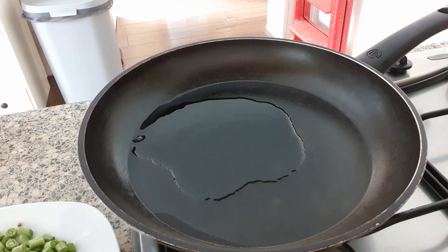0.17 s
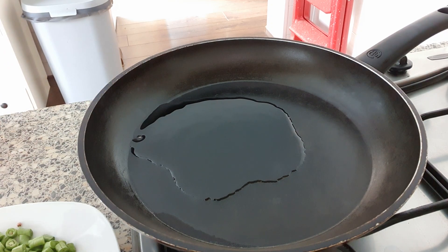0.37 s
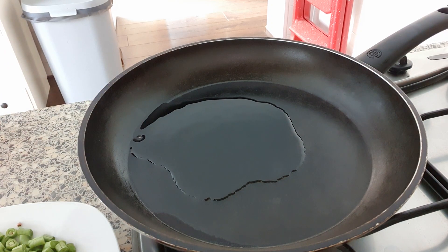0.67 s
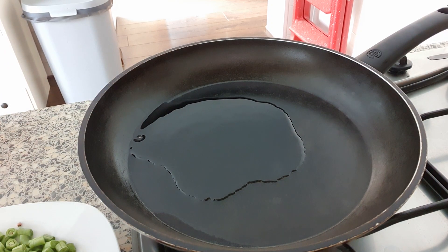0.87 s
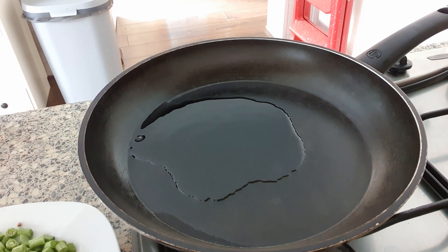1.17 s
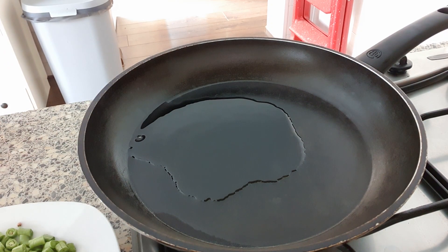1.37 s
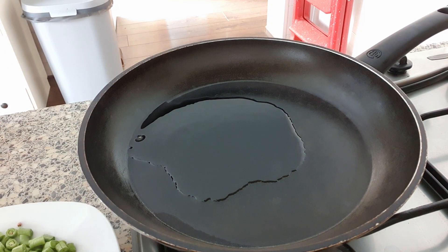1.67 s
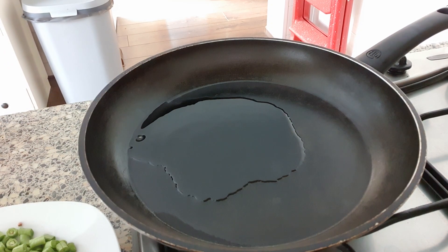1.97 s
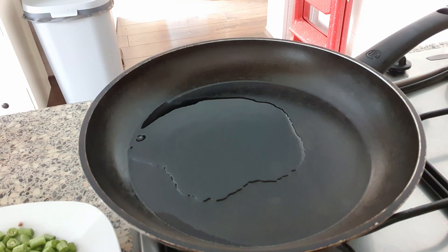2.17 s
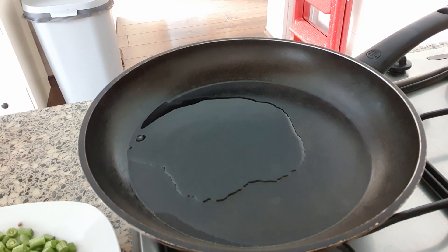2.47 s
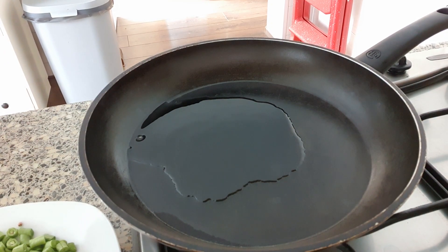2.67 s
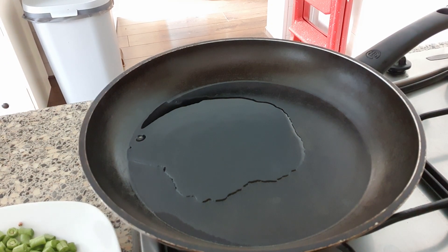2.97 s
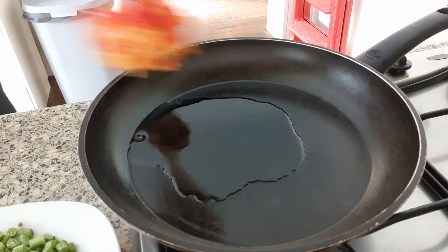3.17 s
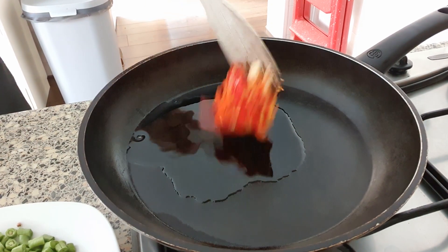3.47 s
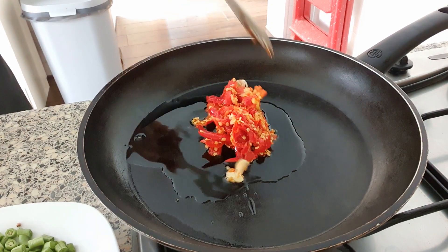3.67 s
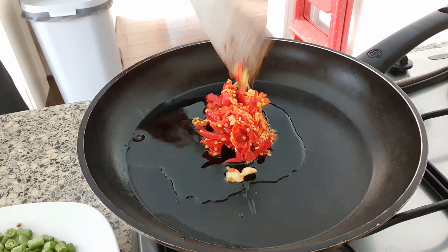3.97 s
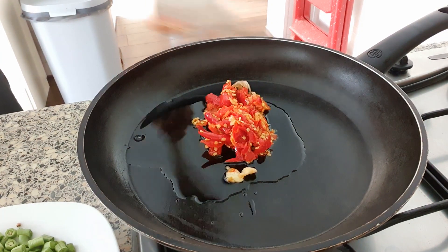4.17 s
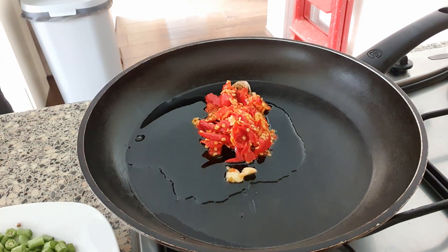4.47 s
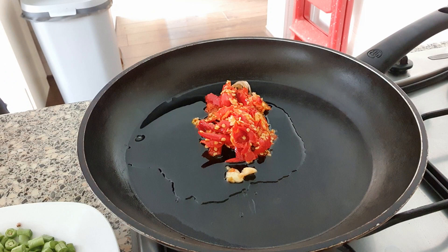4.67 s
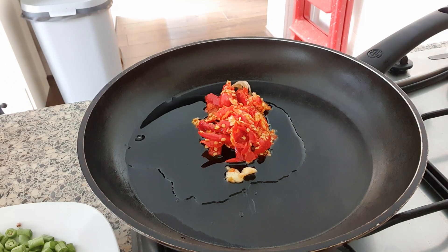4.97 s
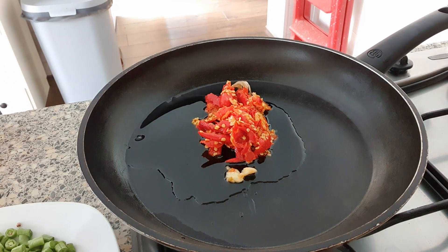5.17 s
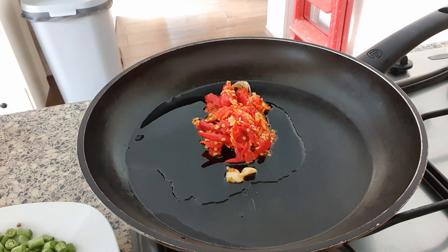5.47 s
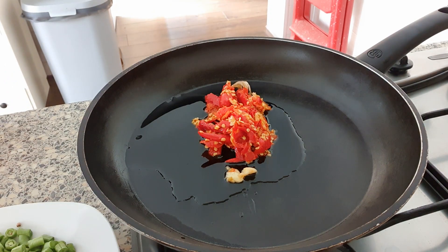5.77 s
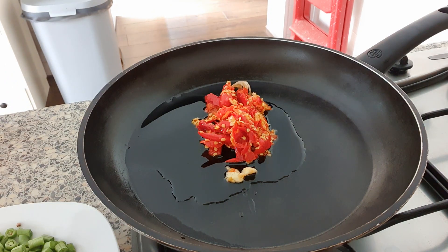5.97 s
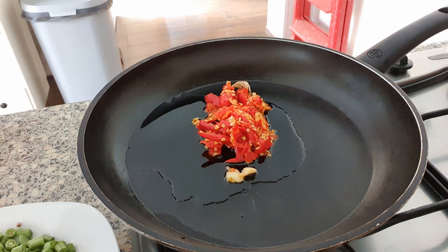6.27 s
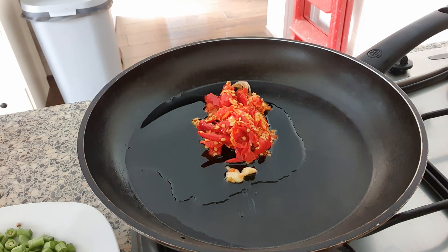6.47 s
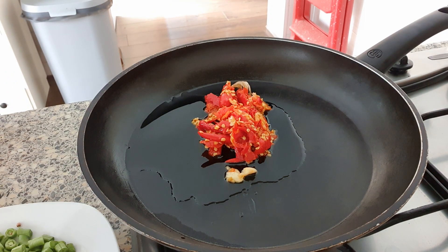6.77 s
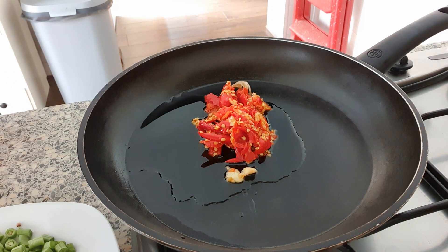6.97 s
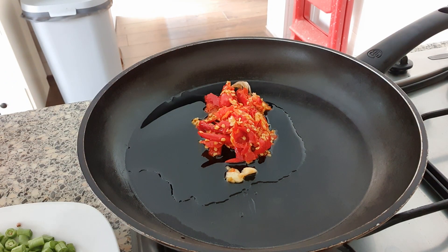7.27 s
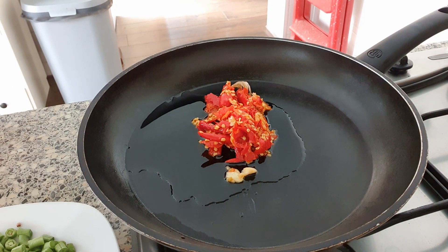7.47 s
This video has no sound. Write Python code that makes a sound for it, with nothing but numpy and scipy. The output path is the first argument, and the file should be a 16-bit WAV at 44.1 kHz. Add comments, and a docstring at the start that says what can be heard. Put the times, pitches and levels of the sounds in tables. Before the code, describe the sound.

A gas burner hisses quietly and steadily throughout, over a low appliance hum and a faint, swelling rumble in a small kitchen. Right at the start, something heavy lands on the counter in a quick cluster of loud, booming thumps. Soft scraping follows until about 0.7 seconds, then two light taps near 1 second. Only a few faint bumps interrupt the hiss until 3.5 seconds, when chillies hit the oil with one short, soft spatter that dies at once. From about 4.9 seconds, close and slightly to the left, a spoon rasps over a bowl and knocks it several times, with dull bumps underneath. The loudest ringing knocks come at about 5.5 and 5.8 seconds, the second one brighter. The scraping fades by 6.5 seconds. After the loudest knock everything sounds slightly quieter, until the hiss and hum recover around 7 seconds.

```python
"""A small kitchen, where a gas burner's jets hiss under a frying pan over a low appliance hum and rumble.
Something heavy lands and sets the counter booming, and chillies hit the oil with one short spatter.
Just to the left, a spoon rasps over a bowl and knocks it into ringing. After the loudest blow
the camera turns its gain down for a while."""
import sys
import numpy as np
from scipy import signal
from scipy.fft import rfft, irfft
from scipy.io import wavfile
from scipy.ndimage import uniform_filter1d

SR = 44100
rng = np.random.default_rng(int(sys.argv[2]) if len(sys.argv) > 2 else 0)


def generate_wav(sig):
    """Save sig (samples, or channels by samples) to the path in sys.argv[1] as 16-bit PCM at SR."""
    pcm = np.round(np.clip(np.atleast_2d(sig).T, -1, 1) * 32767).astype(np.int16)
    wavfile.write(sys.argv[1], SR, pcm)


N = 336042
TIME = np.arange(N) / SR

# The bowl's body, led by a close pair that swells and cancels:
# (frequency [Hz], relative level [dB], t60 [s], polarity [+/-1])
BOWL_BODY_MODES = [(573, 0, .1, 1), (596, 0, .1, -1), (584, -21, .3, 1), (790, -24, .07, 1),
                   (860, -24, .07, -1)]
# The bowl's bright clink: (frequency [Hz], relative level [dB])
BOWL_CLINK_MODES = [(366, 1), (790, -25.5), (860, -4), (1105, -5.5), (1370, 3.5), (1840, -2.5), (1900, 4.5),
                    (2175, -5), (2400, -27), (2700, -18), (3060, -1.5), (3305, -1), (3480, -6), (3890, 1.5),
                    (4200, -27), (4530, 2), (5110, -44.5), (5860, -29.5), (6570, 2.5), (7900, -17)]
CLINK_CYCLES = 140  # a free mode dies by 60 dB in this many cycles
# Spoon hits: (time [s], body level [dB], clink level [dB], clink cutoff [Hz])
SPOON_HITS = [(.847, -45.5, -62, 1350), (.988, -48, -64.5, 1500), (4.93, -40, -49, 1800),
              (5.002, -26.5, -34, 4800), (5.243, -26.5, -45, 2500), (5.478, -17, -15.5, 1800),
              (5.482, -7.5, -30.5, 2550), (5.768, -16.5, -7.5, 5000), (5.826, -28, -35, 3000),
              (5.99, -47, -52, 3010), (6.035, -43.5, -39, 3800)]
def spoon_knocks():
    """Body and clink of the bowl: every hit rings the body, and a harder edge reaches higher modes."""
    clink = ringing([(hz, db, min(CLINK_CYCLES / hz, .09)) for hz, db in BOWL_CLINK_MODES])[:8000]
    clink[:900] += .5 * rng.standard_normal(900) * np.exp(-np.arange(900) / 140)  # contact tick
    clinks = np.zeros(N)
    for at, _, db, cutoff_hz in SPOON_HITS:
        lowpass = signal.butter(3, cutoff_hz, fs=SR, output="sos")
        clinks[round(at * SR):][:8000] += gain_of(db) * signal.sosfilt(lowpass, clink)
    times, body_db, _, _ = np.transpose(SPOON_HITS)
    return excite(impulses(times, body_db), ringing(BOWL_BODY_MODES)), clinks


# The counter's boom: (frequency [Hz], relative level [dB], t60 [s])
COUNTER_MODES = [(106.4, -2, 0.5), (155, 5, 0.11), (225, 5.5, 0.038), (304.4, -11, 0.11), (323.5, -1, 0.19),
                 (445, -17.5, 0.044), (660, -7, 0.075), (710, -14.5, .08), (762, -1.5, 0.12),
                 (873, 2, 0.088)]
# Tone of the crack on each blow: (frequency [Hz], relative level [dB])
CRACK_EQ = [(350, -46.5), (600, -6), (853, -17.5), (1050, -25.5), (1230, -18.5), (1740, -23.5),
            (2390, -25.5), (3510, -33.5), (9000, -59), (11700, -94), (19800, -120)]
# Dull blows and soft bumps: (time [s], push level [dB], contact time [s], crack level [dB])
COUNTER_HITS = [(.003, -21, 0.0055, -33.5), (.034, -13.5, 0.0058, -57), (.052, -4, .0023, -15.5),
                (.058, -7, .0026, -56), (.070, -5.5, 0.0021, -55), (.097, -2.5, 0.0038, -22),
                (0.104, -33, .0043, -50), (.118, -13, 0.0038, -42), (.128, -10.5, 0.0016, -42),
                (.142, -17, 0.0031, -44), (.188, -13, 0.0042, -33), (.24, -30, 0.009, -37),
                (0.46, -41, 0.006, -48), (.589, -39.5, 0.0054, -43), (.848, -29, 0.0022, -40),
                (.991, -35.5, .0021, -49), (1.73, -44.5, 0.0049, -58), (1.855, -43.5, .0095, -55),
                (2.189, -42, 0.0022, -59), (2.695, -45, 0.0023, -52), (2.93, -39, 0.0024, -56),
                (4.929, -26, 0.0041, -48), (5.242, -17, .0027, -41), (5.251, -32, 0.002, -57),
                (5.292, -27.5, .0062, -34), (5.512, -24, 0.0043, -60), (5.554, -25.5, 0.0023, -46),
                (5.599, -31.5, 0.0061, -38), (5.77, -22.5, 0.0038, -22.5), (5.835, -24, 0.003, -35),
                (5.855, -25, 0.0043, -42), (6.463, -46.5, 0.0062, -55)]
def counter_thuds():
    """Each blow is one short push that sets the counter booming, with a brief crack of noise."""
    push = np.zeros(N)
    for at, db, contact_s, _ in COUNTER_HITS:
        near = slice(max(round(at * SR) - 1000, 0), round(at * SR) + 1000)
        spread = (np.pi * (TIME[near] - at) / contact_s) ** 2
        push[near] += gain_of(db) * (1 - 2 * spread) * np.exp(-spread)
    boom = gain_of(-34) * excite(push, ringing(COUNTER_MODES))
    times, _, _, crack_db = np.transpose(COUNTER_HITS)
    samples = np.arange(3000)
    envelope = np.exp(-samples / 340) * np.minimum(samples / 32, 1)
    bursts = excite(impulses(np.maximum(times - .004, 0), crack_db), envelope)
    crack = bursts * unit_rms(equalise(rng.standard_normal(N), CRACK_EQ))
    return push + boom + crack


# Tone of the friction: (frequency [Hz], relative level [dB])
RASP_EQ = [(410, 3.5), (700, 0.5), (1100, -25.5), (1340, 4.5), (1530, -2.5), (1910, 4), (2970, -2.5),
           (6150, -6), (7580, -10.5), (14500, -13), (15700, -77.5)]
STROKE_DB = 20  # rise over a stroke's swell time, and fall over its fade time
# Spoon strokes or brushes of cloth: (crest time [s], level [dB], swell [s], fade [s], treble lift [dB])
STROKES = [(.11, -47, .02, 0.1, 0), (.24, -62.5, .03, 0.19, 3), (.37, -42.5, .3, 0.12, 0.5),
           (.626, -51.5, .12, 0.2, 7), (2.93, -59.5, .3, .3, -4), (4.929, -44.5, .01, 0.015, 2),
           (5.014, -31.5, .035, 0.038, 3), (5.293, -39, .02, 0.097, 7), (5.49, -54.5, .01, 0.076, 7),
           (5.603, -46.5, .12, 0.04, 2.5), (5.854, -38.5, .13, 0.073, 1), (5.95, -49.5, .1, 0.58, 5.5),
           (6.2, -59.5, .1, 0.55, 12)]
def spoon_scrapes():
    """Dense friction grains swell and fade with each stroke and set the bowl singing."""
    level, treble_level = np.zeros(N), np.zeros(N)
    for at, db, swell_s, fade_s, lift_db in STROKES:
        from_crest = np.where(TIME < at, (at - TIME) / swell_s, (TIME - at) / fade_s)
        stroke = gain_of(db - STROKE_DB * np.minimum(from_crest, 5))
        level += stroke
        treble_level += stroke * gain_of(lift_db)
    grit = grains(uneven_db=2.95)
    bowl = ringing([(hz, db, CLINK_CYCLES / hz) for hz, db in BOWL_CLINK_MODES if hz > 1000])
    singing = gain_of(-10.5) * unit_rms(excite(grit, bowl))
    rasp = unit_rms(unit_rms(equalise(grit, RASP_EQ)) + singing)
    dull = signal.sosfiltfilt(signal.butter(2, 6500, fs=SR, output="sos"), rasp)
    return level * dull + treble_level * (rasp - dull)


# Tone of the spatter: (frequency [Hz], relative level [dB])
SPATTER_EQ = [(300, -18), (800, 0.5), (2400, -5.5), (4500, -4.5), (9000, -6), (14000, -4)]
def chilli_spatter(at_s, level_db, t60_s):
    """Chillies meet the oil: a sudden wet spray of noise that dies quickly."""
    age = TIME - at_s
    spray = unit_rms(equalise(grains(uneven_db=0), SPATTER_EQ))
    attack = np.clip(age / .0019, 0, 1)
    return gain_of(level_db - 60 * abs(age) / t60_s) * attack * spray


# Broad hiss between the jets: (frequency [Hz], relative left [dB], relative right [dB], coherence [0-1])
HISS_BED = [(25, -37, -26, 1), (46.6, -3.5, 6, 0.8), (93, -1, -0.5, 1), (256, -10, -10.5, 0.67),
            (494, -17.5, -21, 0.57), (990, -43.5, -30.5, .1), (2600, -55.5, -21.5, 0.05),
            (5080, -14.5, -52.5, 0.05), (7550, -31.5, -15, .2), (9300, -62, -12, .2),
            (11300, -21, -23.5, 0), (13000, -24.5, -23, .4), (15700, -26.5, -31, 0.3)]
# Gas jets sounding under the pan:
# (frequency [Hz], width [Hz], relative left [dB], relative right [dB], coherence [0-1], left lead [rad])
GAS_JETS = [(632.6, 104, -6.5, -8, 0.7, 0.5), (795, 107, -12.5, -12, 0.2, 0.5),
            (1730, 392, -2.5, -11.5, 0.71, 0.77), (3659, 503, 0, -6.5, 0.53, -2),
            (5760, 330, -12.5, -9, 0, -1.7), (6330, 230, -16, -5, .7, 1), (6553, 314, 3, -4.5, 0.16, 1),
            (6794, 630, -7, -29, 0.7, -12.5), (8250, 620, -15.5, -17.5, 0.56, -2),
            (8630, 250, -24.5, -10, 0.6, 12.5), (9236, 190, -7.5, -3.5, 0.7, -4.5),
            (9950, 207, -40.5, -12, .3, -0.5), (10840, 110, -26.5, -9.5, 0.98, -10),
            (12070, 200, -23.5, -15, .6, -0.5), (12300, 170, -8, -8.5, 0.93, 2.5),
            (13300, 400, -24.5, -18.5, 0.4, -0.5), (14020, 300, -6.5, -13, 0.6, -4.5),
            (14430, 300, -11, -9, .7, 1), (15100, 250, -7.5, -3, 1, 1.1), (15100, 180, -13, -8, .7, 1),
            (15400, 250, -10, -20.5, .5, -3), (15820, 150, -23, -21, .8, -0.5)]
def gas_burner(level_db):
    """Jet resonances over broad hiss: a nearly steady flame, patchy and gently swelling."""
    frames, hz = N // 512 + 5, np.fft.rfftfreq(2048, 1 / SR)
    left_db, right_db, coherence = curves_at(HISS_BED, hz)
    power = gain_of([left_db, right_db]) ** 2
    cross_power = coherence * gain_of(left_db + right_db) + 0j
    for jet_hz, width_hz, left_db, right_db, coherence, lead in GAS_JETS:
        peak = 1 / (1 + (2 * (hz[:, None] - jet_hz) / width_hz) ** 2) ** 1.984
        power += gain_of([[[left_db]], [[right_db]]]) ** 2 * peak
        cross_power += coherence * np.exp(1j * lead) * gain_of(left_db + right_db) * peak
    patches = uniform_filter1d(rng.standard_normal((frames, len(hz))).T, size=8, axis=0)
    patches = unit_rms(uniform_filter1d(patches, size=5, axis=1))
    swell = wander(np.arange(frames) * 512 / SR, lo_hz=.406, hi_hz=7.7)
    # Echoes off pan and counter ripple the spectrum.
    ripple = unit_rms(uniform_filter1d(rng.standard_normal((2, len(hz), 1)), size=2, axis=1))
    noise = stereo_spectra(len(hz), frames, cross_power / np.sqrt(power[0] * power[1]))
    spectra = noise * np.sqrt(power) * gain_of(1.9 * ripple + 2 * patches + .3 * swell)
    hiss = signal.istft(spectra, nperseg=2048, noverlap=1536)[1][:, :N]
    return gain_of(level_db) * unit_rms(hiss)


# Motor tones: (frequency [Hz], centre level [dB rms])
HUM_PARTIALS = [(49.3, -52.5), (143.6, -81), (246.9, -67.5), (296.2, -73)]
def appliance_hum(drift_hz=.84, waver_db=1.8):
    """A motor hums, each partial wavering in pitch and strength."""
    coarse_time = np.arange(0, N + 441, 441) / SR
    hum = np.zeros(N)
    for hz, db in HUM_PARTIALS:
        drift = np.interp(TIME, coarse_time, wander(coarse_time, lo_hz=.97, hi_hz=17))
        waver = np.interp(TIME, coarse_time, wander(coarse_time, lo_hz=.97, hi_hz=17))
        phase = 2 * np.pi * np.cumsum(hz + drift_hz * drift) / SR
        hum += np.sqrt(2) * gain_of(db + waver_db * waver) * np.sin(phase)
    return hum


# The rumble's fader moves: (time [s], level [dB rms])
RUMBLE_LEVELS = [(.4, -62), (0.999, -52.5), (1.2, -68.5), (1.72, -68), (1.85, -55), (1.97, -64.5),
                 (2.6, -61), (2.85, -51.5), (3.18, -62), (3.46, -63.5), (3.94, -55), (4.6, -59.5),
                 (4.76, -77), (5.0, -52), (5.3, -72), (5.5, -50), (5.75, -72), (7.0, -77)]
def low_rumble():
    """Noise near 100 Hz swells and sinks, almost alike on both sides."""
    times, db = np.transpose(RUMBLE_LEVELS)
    band = signal.butter(2, [62, 150], "band", fs=SR, output="sos")
    mid, side = signal.sosfilt(band, rng.standard_normal((2, N)))
    stereo = np.array([mid + .11 * side, mid - .08 * side])
    return gain_of(np.interp(TIME, times, db)) * unit_rms(stereo)


# The kitchen's reverb: (frequency [Hz], t60 [s], coherence [0-1])
ROOM_DECAY = [(80, 0.3, 1), (208, 0.41, 0.7), (388, 0.3, 0.87), (710, 0.32, 0.03), (1307, 0.31, 0.12),
              (4110, 0.19, 0.1), (11800, 0.077, 0.4)]
# The bowl's place in the image, at pan=1: (frequency [Hz], left minus right [dB])
BOWL_PAN = [(80, 1.5), (300, 5), (590, 7), (1300, 3), (4400, 14), (15000, -6)]
def kitchen(x, wet_db, pan=1):
    """Direct sound and a noisy tail that dies band by band, both leaning left."""
    hz, frame_time = np.fft.rfftfreq(512, 1 / SR), np.arange(260) * 128 / SR
    t60, coherence = curves_at(ROOM_DECAY, hz)
    spectra = stereo_spectra(len(hz), len(frame_time), coherence) * gain_of(-60 * frame_time / t60)
    response = signal.istft(spectra, nperseg=512, noverlap=384)[1]
    length = response.shape[1]
    response *= np.clip((np.arange(length) / SR - .002) / .0058, 0, 1)  # reflections build up
    response *= gain_of(wet_db) / np.linalg.norm(response[0])
    response[0, 0], response[1, 16] = 1, 1  # the direct sound reaches the right side later
    lean_db = pan * curves_at(BOWL_PAN, np.fft.rfftfreq(length, 1 / SR))[0][:, 0]
    panned = irfft(rfft(response) * gain_of([lean_db / 2, -lean_db / 2]), length)
    return signal.fftconvolve(x[None], np.roll(panned, 64, axis=1), axes=1)[:, 64:N + 64]


def gain_of(db):
    """Decibels to amplitude."""
    return 10 ** (np.asarray(db) / 20)


def unit_rms(x):
    """Scales to rms 1."""
    return x / np.sqrt(np.mean(abs(x) ** 2) + 1e-20)


def curves_at(table, hz):
    """A table's columns, interpolated over log frequency."""
    table_hz, *columns = np.transpose(table)
    return [np.interp(np.log(hz + 1), np.log(table_hz + 1), column)[:, None] for column in columns]


def equalise(x, eq):
    """Filters by a curve of (frequency [Hz], level [dB])."""
    gains = gain_of(curves_at(eq, np.fft.rfftfreq(1024, 1 / SR))[0][:, 0])
    return signal.oaconvolve(x, np.roll(irfft(gains), 512), "same")


def stereo_spectra(bins, frames, coherence):
    """Left and right short-time noise spectra; complex coherence sets their likeness and phase."""
    a, b, c, d = rng.standard_normal((frames, bins, 4)).T
    left, independent = a + 1j * b, c + 1j * d
    coherence = coherence / np.maximum(abs(coherence), 1)
    right = np.conj(coherence) * left + np.sqrt(1 - np.minimum(abs(coherence), 1) ** 2) * independent
    return np.array([left, right])


def wander(t, lo_hz, hi_hz):
    """Slow random motion of rms 1."""
    rates = np.geomspace(lo_hz, hi_hz, num=24)
    return unit_rms(sum(np.sin(2 * np.pi * (hz * t + rng.random())) / np.sqrt(hz) for hz in rates))


def grains(uneven_db):
    """Noise in sub-millisecond grains of uneven strength."""
    noise = rng.standard_normal(N)
    strengths = np.minimum(rng.exponential(1, N // 32 + 1), 4)
    return unit_rms(noise * gain_of(uneven_db * np.repeat(strengths, 32)[:N]))


def impulses(times, db):
    """One click at each time, at the given level."""
    train = np.zeros(N)
    train[np.round(times * SR).astype(int)] = gain_of(db)
    return train


def ringing(modes):
    """Sum of dying sines, peak 1."""
    t = np.arange(SR // 2) / SR
    ring = sum(np.prod(polarity) * gain_of(db - 60 * t / t60) * np.sin(2 * np.pi * hz * t)
               for hz, db, t60, *polarity in modes)
    return ring / abs(ring).max()


def excite(drive, response):
    """Plays a driving signal through an impulse response."""
    return signal.oaconvolve(drive, response)[:N]


def scene():
    """Blows, scrapes and spatter in the room, over burner, hum and rumble."""
    body, clinks = spoon_knocks()
    thuds = kitchen(counter_thuds(), wet_db=-6, pan=.3)
    knocks = kitchen(body, wet_db=-17) + kitchen(clinks, wet_db=-4)
    cooking = kitchen(spoon_scrapes() + chilli_spatter(at_s=3.534, level_db=-45, t60_s=.3), wet_db=-6)
    return thuds + knocks + cooking + gas_burner(level_db=-46.5) + appliance_hum() + low_rumble()


def record(dry):
    """The camera loses the deepest bass and top treble; a loud peak ducks its gain for a while."""
    threshold, duck_db, hold_s, release_s = .645, 4.4, 1.2, .24
    low_cut_hz, high_cut_hz = 38, 15730
    dry = signal.sosfilt(signal.butter(2, low_cut_hz, "high", fs=SR, output="sos"), dry)
    too_loud = abs(dry).max(axis=0) > threshold
    since_peak = TIME - np.maximum.accumulate(np.where(too_loud, TIME, -9))
    cut_db = duck_db * np.clip(1 - (since_peak - hold_s) / release_s, 0, 1)
    cut_db = signal.lfilter([.0003], [1, .0003 - 1], cut_db)  # the gain lags by about 75 ms
    ducked = np.clip(dry / gain_of(cut_db), -1, 1)
    lowpass = signal.firwin(1023, high_cut_hz, window=("kaiser", 9), fs=SR)
    return signal.oaconvolve(ducked, lowpass[None], "same")


dry = scene()
out = record(dry)
generate_wav(out)
```